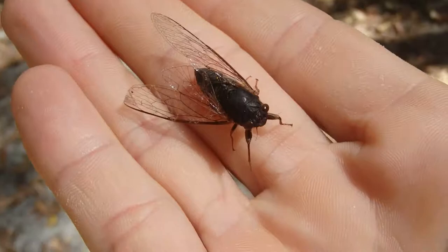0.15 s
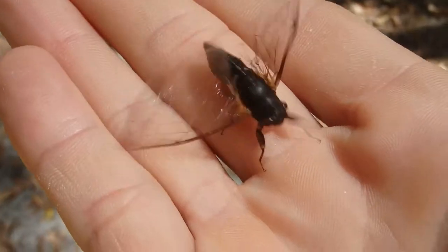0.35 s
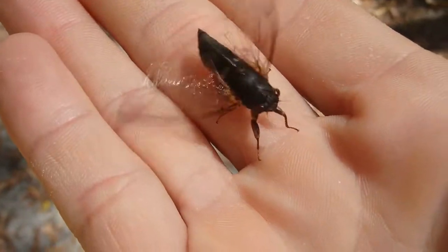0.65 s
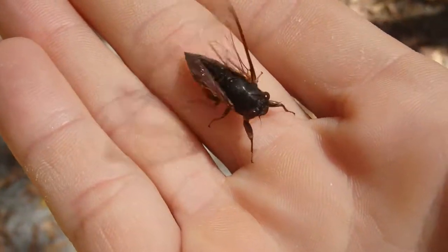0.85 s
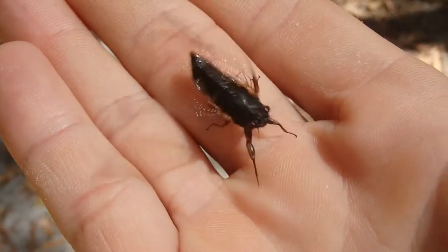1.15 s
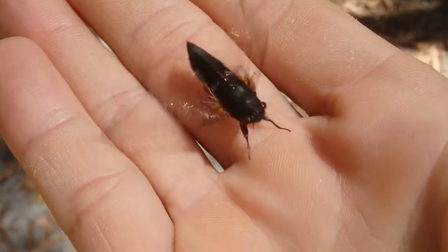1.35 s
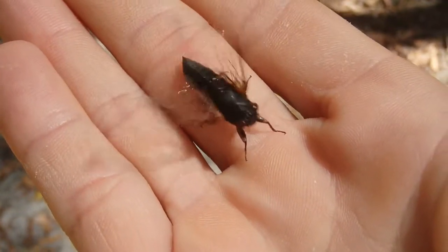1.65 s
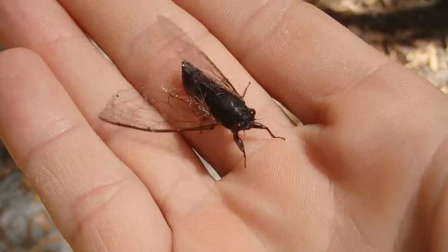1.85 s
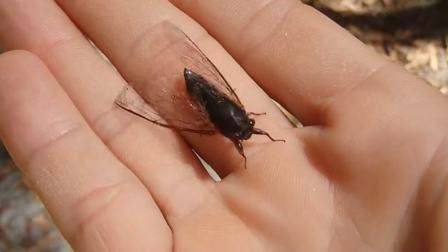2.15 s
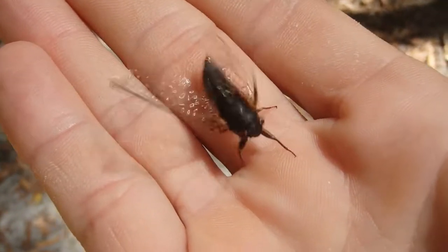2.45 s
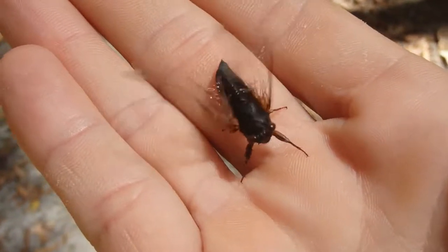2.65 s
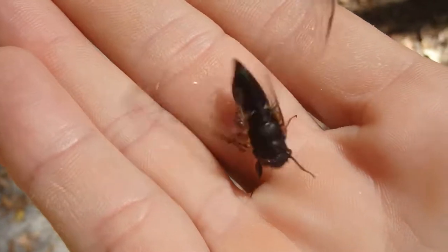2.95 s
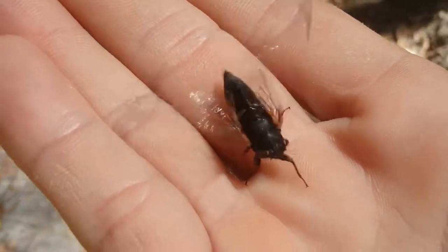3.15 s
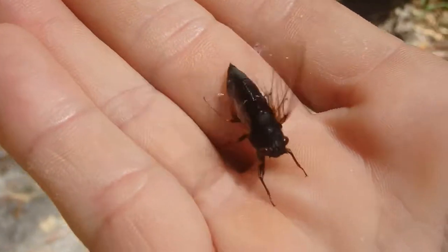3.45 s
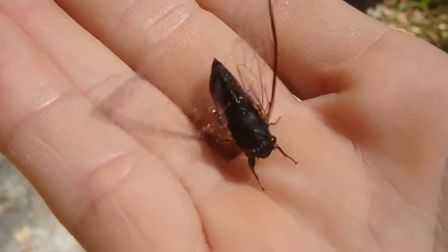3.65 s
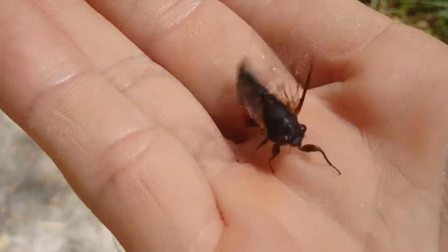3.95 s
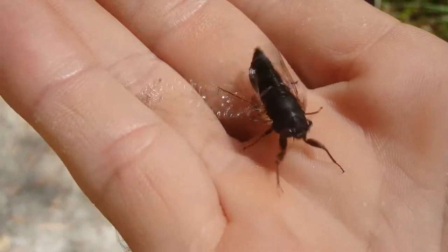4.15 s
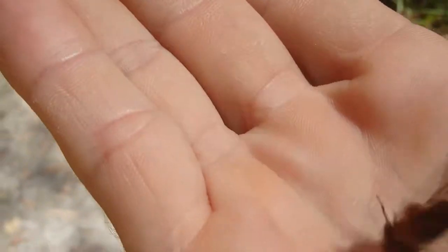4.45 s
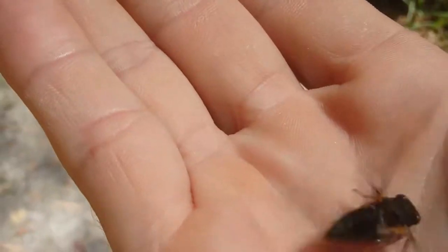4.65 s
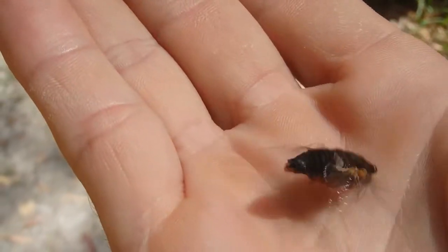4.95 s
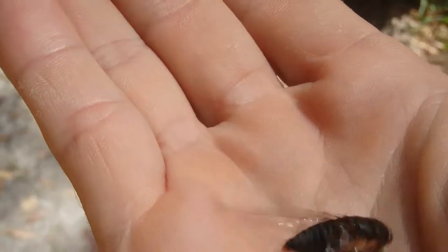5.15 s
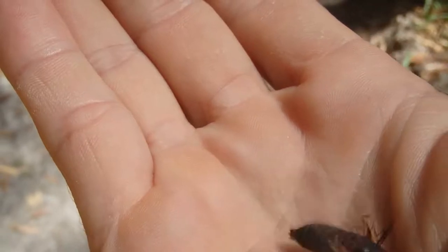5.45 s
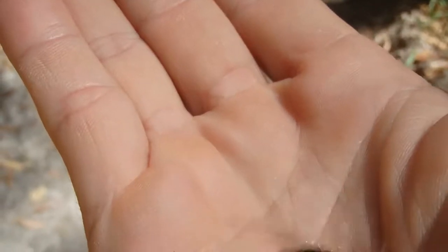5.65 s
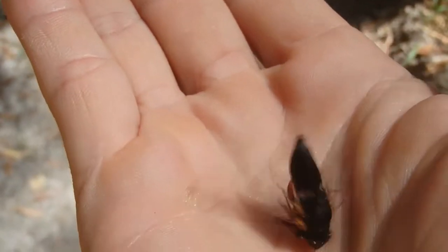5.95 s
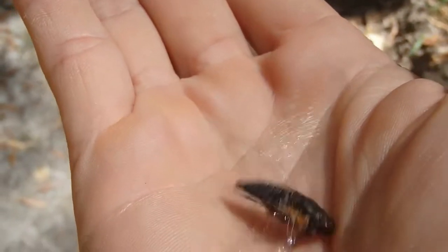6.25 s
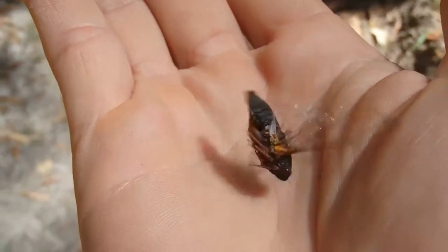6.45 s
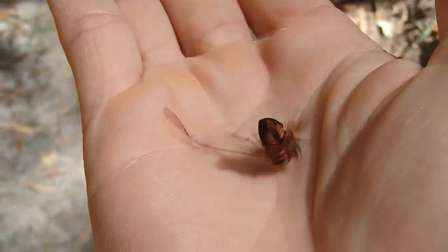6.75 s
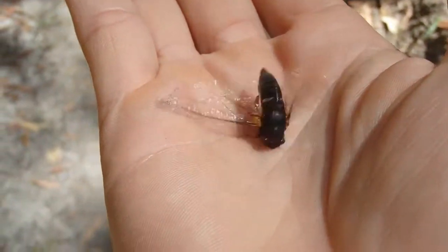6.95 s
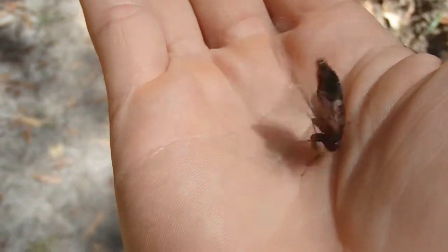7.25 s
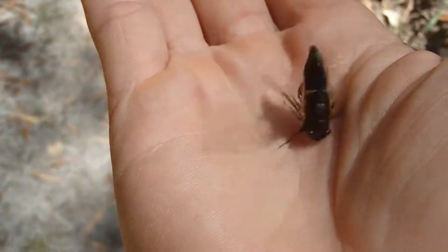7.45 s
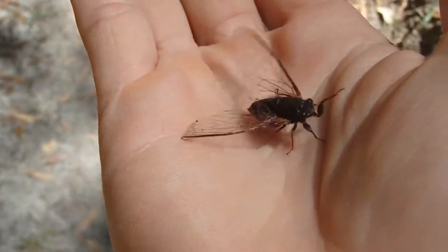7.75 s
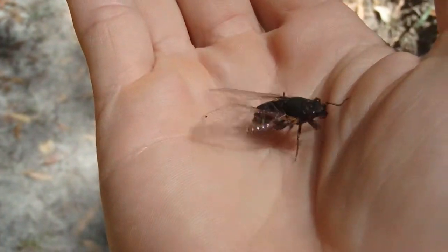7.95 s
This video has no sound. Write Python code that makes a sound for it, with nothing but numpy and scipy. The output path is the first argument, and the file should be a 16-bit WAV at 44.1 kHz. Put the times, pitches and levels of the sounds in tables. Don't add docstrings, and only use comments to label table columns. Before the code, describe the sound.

Outdoors, very close to a small camera microphone, a cicada sits on an open palm. For the first half second there is only soft outdoor hiss, a faint low hum and a few small flicks. From 0.5 to 1.0 s its wings rattle in a loud, dry run of about fifty snaps a second. After a gap with a lone click, more runs follow from 1.35 to 2.0 s and 2.45 to 3.25 s, then short broken bursts until 4.0 s and another run from 4.15 to 4.5 s. Then it tumbles: irregular crackling flutters, hard slaps, tiny claw ticks, papery rustle and low air puffs, with brief gaps as it hops. A dull soft bump falls near 5.8 s. The ragged snapping continues until about 7.9 s, then drops to quiet hiss. The clicks are bright, brittle, ringing and stronger on the left.

```python
import sys
import numpy as np
from scipy import signal
from scipy.fft import irfft
from scipy.io import wavfile
from scipy.ndimage import uniform_filter1d

SR = 44100
rng = np.random.default_rng(int(sys.argv[2]) if len(sys.argv) > 2 else 0)


def persist_wave(psi):
    counts = np.round(np.clip(psi, -1, 1) * 32767).astype(np.int16)
    wavfile.write(sys.argv[1], SR, np.atleast_2d(counts).T)


def makeup_ratio(level_db):
    decades = np.asarray(level_db, float) / 20
    return 10 ** decades


N = 356857

# pitch in Hz, left level in dB, right level in dB, left-right likeness from 0 to 1.
WASH = [(25, -35, -43, .5), (89, -1.5, 0, 0.13), (324, 0.5, 0, 0.73), (1050, 0.5, 1, 0.81),
        (2640, -5, -3.5, 0.33), (3470, -8.5, -9, .05), (4030, -3, -6, .05), (4700, -8, -9.5, .02),
        (8300, -9, -11, .02), (12400, -6.5, -9, .02), (15600, -11, -8.5, .02), (16300, -50, -50, .02)]
WASH_DB = -49
# middle in seconds, half width in seconds, level in dB.
HUM_SWELLS = [
    (.45, 0.97, -59),
    (1.6, 0.26, -59.5),
    (2.75, 0.43, -59.5),
    (3.8, 0.41, -64),
    (4.9, 0.65, -66.5),
    (5.7, 0.13, -59),
    (6.5, 0.32, -60),
    (7.3, 0.62, -64.5),
]
# first in Hz, last in Hz.
HUM_HZ = (101.7, 97.8)
KNOCK_S, KNOCK_DB, KNOCK_HZ = 5.836, -34, 130
# start in seconds, level in dB.
DRAUGHT = [
    (0, -54.5),
    (3.3, -55.5),
    (3.64, -51.5),
    (4.15, -60.5),
    (4.7, -48),
    (5.75, -52),
    (5.95, -62.5),
    (6.36, -51),
    (7.1, -61.5),
    (8.1, -53),
]
# pitch in Hz, left level in dB, right level in dB,
# how far the left leads in radians.
PORTS = [(293, -47.5, -27.5, 2), (1480, -31, -32, -0.13), (3210, -12.5, -10.5, 1.86),
         (3670, -3, -11.5, 2.5), (4090, 0, -11.5, 1.25), (4590, -8, -15, 2), (5350, -18, -62, 8),
         (5790, -6.5, -26.5, -1.5), (7770, -17, -31.5, 2), (8650, -12, -29.5, -1), (11130, -20, -30, 0.5),
         (12060, -36, -32, 0), (14600, -32, -28.5, 1.5), (15500, -43, -61, 22)]
# time in seconds, extra low-mid in dB from the flat of the wing on the skin,
# echo off the palm from 0 to 1, extra treble in dB from the wing edge towards the camera.
POSTURE = [
    (0, -7.5, 0, -5),
    (3.3, 0.5, 0, 2),
    (4.6, 3.5, 1, 3),
    (8.1, 2.5, 1, 3),
]
# first stroke in seconds, last stroke in seconds,
# number of strokes, snap level in dB over one ms, rustle level in dB.
PERCHED_RUNS = [(.5145, 0.7083, 11, -17.5, -31.5), (.7295, .97, 13, -10.5, -39),
                (1.357, 1.422, 4, -12, -40.5), (1.442, 1.5892, 9, -11, -31.5),
                (1.613, 1.8608, 14, -13, -37), (1.878, 2.007, 7, -10, -46), (2.452, 2.824, 20, -13, -34),
                (2.8442, 3.0683, 12, -13.5, -34), (3.0887, 3.236, 8, -11, -37),
                (3.4137, 3.434, 2, -15.5, -39), (3.564, 3.656, 6, -18.5, -34), (3.6767, 3.6999, 2, -6, -41),
                (3.862, 3.9183, 3, -14.5, -47), (4.147, 4.3847, 13, -11, -36),
                (4.4074, 4.47, 4, -11.5, -30)]
# first stroke in seconds, last stroke in seconds,
# number of strokes, snap level in dB over one ms, rustle level in dB.
TUMBLING_RUNS = [(4.5295, 4.548, 2, -7.5, -29.5), (4.581, 4.6222, 3, -19, -41),
                 (4.6963, 4.711, 2, -15, -26.5), (4.877, 5.044, 8, -16, -34.5),
                 (5.1337, 5.196, 3, -13.5, -35), (5.2586, 5.2828, 2, -15, -40),
                 (5.4022, 5.508, 6, -25, -37), (5.533, 5.597, 4, -11.5, -32.5),
                 (5.644, 5.6827, 3, -17, -31.5), (5.713, 5.8019, 5, -12.5, -33),
                 (5.883, 5.907, 2, -19.5, -50), (5.991, 6.0406, 3, -23, -39), (6.088, 6.175, 6, -20, -52),
                 (6.269, 6.3477, 5, -19, -51), (6.383, 6.415, 2, -26.5, -31.5),
                 (6.573, 6.6392, 4, -16, -39), (6.7407, 6.795, 5, -18.5, -40),
                 (6.8553, 6.894, 3, -19.5, -41), (6.9535, 6.98, 2, -18, -46),
                 (7.268, 7.363, 5, -17.5, -47.5), (7.4667, 7.528, 5, -14.5, -58),
                 (7.548, 7.6778, 8, -22, -49), (7.703, 7.791, 5, -16, -34.5), (7.807, 7.903, 6, -17, -37)]
# time in seconds, snap level in dB over one ms, drag in ms.
FLICKS = [(.198, -41, .8), (.4766, -20, .2), (.497, -25, 1.4), (1.0436, -9, 0), (1.2009, -29, .4),
          (1.3185, -29, .3), (2.0688, -6, 0), (2.0973, -19, .5), (2.219, -35, 1.3), (2.3134, -24, .5),
          (2.344, -7, 0), (2.4204, -27, .2), (3.3246, -18, .5), (3.351, -21, .2), (3.4814, -12, .5),
          (3.5398, -14, 0), (3.7386, -11, 0), (3.7665, -25, 1.3), (3.8373, -5, 0), (4.0125, -8, 1),
          (3.8596, -8, 1.3), (4.0707, -27, .7), (4.11, -42, 1.1), (4.504, -13, 1.7), (5.3563, -17, 2.6),
          (7.01, -28, 1), (7.0423, -20, 0), (7.4001, -18, 1.1), (7.985, -44, .4), (8.02, -42, .8)]
# time in seconds, snap level in dB over one ms, drag in ms.
ACCENTS = [(0.65, -9.5, 0), (0.8289, -8.5, 0), (0.8497, -8, 0.33), (.9091, -6, 0.47), (1.354, -23.5, .6),
           (1.3766, -7.5, 0.15), (1.4424, -7, 0.13), (1.5322, -7, .1), (1.612, -21, 0.63),
           (2.5505, -20, 1.4), (2.629, -40, 1), (2.6493, -7, 0.28), (2.8442, -9.5, .2), (2.9466, -25, 1.1),
           (3.0446, -10.5, 0.21), (3.065, -9, 0.48), (3.089, -18, 1.3), (3.2129, -8.5, 0.37),
           (3.56, -27, 1.5), (3.8928, -7.5, 1.56), (4.1654, -10, 2), (4.3874, -10, 0.13),
           (.9305, -10.5, 0.53), (1.8993, -7.5, .5), (1.921, -7.5, 0.18), (2.4519, -11, .9),
           (2.6085, -13.5, .2), (4.5515, -8.5, 1.05), (4.973, -9.5, 1.3), (6.799, -12.5, 1)]
# time in seconds, snap level in dB over one ms, drag in ms.
SLAPS = [(4.652, -14, .6), (4.6854, -6, 0), (4.7665, -16, .8), (4.822, -15, .9), (4.9289, -8, .5),
         (5.0858, -17, 2), (5.2028, -7, .1), (5.3312, -6, 2.6), (5.4431, -10, 1.2), (5.4838, -9, 1.8),
         (5.5487, -4, 0), (5.6892, -12, 1.7), (5.8019, -6, 1.8), (5.8375, -4, 0), (5.9541, -22, .4),
         (6.1966, -10, 2.5), (6.2226, -14, 1.6), (6.3291, -14, 2.6), (6.4314, -7, 1), (6.4671, -12, 2.6),
         (6.5207, -13, 0), (6.704, -12, 2.6), (6.9177, -7, 0), (7.0637, -11, 1.2), (7.1265, -7, .6),
         (7.1716, -15, 2.6), (7.2075, -13, 1.6), (7.439, -19, .7), (7.499, -9, 0), (7.5232, -9, 0)]
# time in seconds, drag in ms.
DRAG = [
    (0, .5),
    (3.7, .4),
    (4.1, 1.6),
    (4.5, 1.7),
    (4.9, .9),
    (8.1, 1.1),
]
AIRBORNE = [4.745, 5.115, 5.385, 5.625, 5.93, 6.065, 6.255, 7.42]
HOP_S = .018
JITTER_MS, SCATTER_DB = .5, 1.4
LIMP_MS, LIMP_DB = .5, .8
DRAG_SCATTER_MS = .4
LEAD_S, TRAIL_S, STILL_DB = 0.015, 0.022, -58
SCRABBLE_FROM_S, SCRABBLE_TO_S, SCRABBLE_DB = 4.5, 7.93, -45
SKID_S, SKID_DB = 0.048, -45.5
TICKS_COUNT, TICK_DB = 110, -24
LULL = .45


def evened(x):
    return x / np.sqrt(np.mean(x ** 2) + 1e-20)


def on_log_hz(table, hz):
    f, *columns = np.transpose(table)
    return [np.interp(np.log(hz + 1), np.log(f), c) for c in columns]


def on_time(table):
    s, *columns = np.transpose(table)
    return [np.interp(np.arange(N) / SR, s, c) for c in columns]


def wash(patchy_db=.4):
    frames = N // 256 + 5
    left_db, right_db, same = (c[:, None] for c in on_log_hz(WASH, np.fft.rfftfreq(1024, 1 / SR)))
    a, b, c, d, patches = rng.standard_normal((frames, 513, 5)).T
    patches = evened(uniform_filter1d(uniform_filter1d(patches, 12, 0), 20, 1))
    same = np.clip(same, 0, 1)
    left = a + 1j * b
    right = same * left + np.sqrt(1 - same ** 2) * (c + 1j * d)
    z = np.array([left, right]) * makeup_ratio(np.array([left_db, right_db]) + patchy_db * patches)
    noise = signal.istft(z, nperseg=1024, noverlap=768)[1][:, :N]
    return makeup_ratio(WASH_DB + 1.5) * evened(noise)


def hum():
    t = np.arange(N) / SR
    turns = np.cumsum(np.linspace(*HUM_HZ, N)) / SR
    level = sum(makeup_ratio(db) * np.exp(-((t - s) / width) ** 2) for s, width, db in HUM_SWELLS)
    sides = makeup_ratio(np.array([[-1.5], [1.5]]))
    return np.sqrt(2) * level * sides * np.sin(2 * np.pi * turns)


def knock():
    u = np.maximum(np.arange(N) / SR - KNOCK_S, 0) * 2 * np.pi * KNOCK_HZ
    return makeup_ratio(KNOCK_DB) * u * (2 - u) * np.exp(-u)


def draught(strokes, hz=215, ring_ms=1.57, swish_db=3.5, swish_hz=1100):
    t = np.arange(1024) / SR
    pushes = makeup_ratio(1.3 * rng.standard_normal(N)) * (strokes > 0)
    puff = np.sin(2 * np.pi * hz * t) * t * np.exp(-t * 1000 / ring_ms)
    puffs = evened(signal.oaconvolve(pushes, puff)[:N])
    gusts = signal.oaconvolve(pushes, t * np.exp(-t * 130))[:N]
    band = signal.butter(1, [150, swish_hz], "bandpass", fs=SR)
    air = signal.lfilter(*band, rng.standard_normal((2, N)))
    swish = evened(gusts * np.array([air[0], air[0] + 0.19 * air[1]]))
    puffs = signal.lfilter(*signal.butter(2, hz / 2, "high", fs=SR), puffs)
    return makeup_ratio(on_time(DRAUGHT)[0] - 2.5) * (puffs + makeup_ratio(swish_db) * swish)


def ports(size=1024, order=32):
    left_db, right_db, lead = on_log_hz(PORTS, np.fft.rfftfreq(size, 1 / SR))
    log_gain = np.log(makeup_ratio(left_db))
    phase = -signal.hilbert(np.r_[log_gain, log_gain[-2:0:-1]]).imag[:len(lead)]
    ring = irfft(makeup_ratio([left_db, right_db]) * np.exp(1j * np.array([phase, phase - lead])), size)
    ring = ring / np.linalg.norm(ring[0])
    return np.roll(ring, order, 1)[:, :size // 2], order


def run_strokes():
    runs = PERCHED_RUNS + TUMBLING_RUNS
    chance, even, rows = rng.standard_normal((len(runs), 20, 3)), [], []
    for (first, last, count, db, _), draw in zip(runs, chance):
        k = np.arange(round(count))
        s = np.linspace(first, last, len(k))
        limp = (-1.) ** k
        late, hard, long = draw[k].T
        drag_ms = np.interp(s, *np.transpose(DRAG)) + DRAG_SCATTER_MS * (long - hard) / np.sqrt(2)
        when = s + (JITTER_MS * late + LIMP_MS * limp) / 1000
        even += list(s)
        rows += zip(when, db + SCATTER_DB * hard - LIMP_DB * limp, drag_ms)
    return np.array(rows), np.array(even)


def stray_ticks():
    when, size, drag_ms = rng.random((TICKS_COUNT, 3)).T
    s = SCRABBLE_FROM_S + (SCRABBLE_TO_S - SCRABBLE_FROM_S) * when
    ticks = np.c_[s, TICK_DB + 10 * (size - .5), drag_ms / 2]
    ticks[abs(ticks[:, :1] - AIRBORNE).min(1) < HOP_S, 1] = -99
    return ticks


def beats():
    blows = np.array(FLICKS + ACCENTS + SLAPS)
    rows, even = run_strokes()
    taken = abs(rows[:, :1] - blows[:, 0]).min(1) < .007
    rows[taken, 1] = -99
    return np.r_[rows, blows, stray_ticks()], even


def snap(ring, db, spread_ms, echo, draw, uneven_db=7.0, wobble_db=1.0, size=800):
    count = int(np.clip(1.8 + 9 * spread_ms, 1, len(draw)))
    delay = draw[:count, 0] + draw[:count, 0] ** 2 / 7
    at = size // 2 + delay * (.05 + 1.1 * spread_ms) * SR / 1000
    at = np.clip(at, 0, size - 20).astype(int)
    burst = np.zeros(size)
    np.add.at(burst, at, np.sign(draw[:count, 1]) * makeup_ratio(uneven_db * abs(draw[:count, 1])))
    blunt = np.clip(.6 - .35 * spread_ms + .18 * draw[0, 2], .05, .6)
    burst = np.convolve(burst, [blunt, 1, blunt], "same")
    burst = burst + echo * np.tanh(2 * draw[3, 2]) * np.roll(burst, 3 + int(7.0 * abs(draw[4, 2])))
    other = np.roll(burst, int(round(0.33 * draw[1, 2]))) * makeup_ratio(wobble_db * draw[2, 2])
    energy = np.sum(signal.oaconvolve(burst, ring) ** 2) * 1000 / SR
    return np.array([burst, other]) * makeup_ratio(db) / np.sqrt(energy)


def busy(size=32):
    t = np.arange(0, N, size) / SR
    on_skin = np.prod([abs(t - s) > HOP_S for s in AIRBORNE], axis=0)
    level = makeup_ratio(STILL_DB) + makeup_ratio(SCRABBLE_DB) * (t > SCRABBLE_FROM_S) * (t < SCRABBLE_TO_S) * on_skin
    for first, last, count, _, db in PERCHED_RUNS + TUMBLING_RUNS:
        ramp = np.clip(np.minimum((t - first) / LEAD_S, (last - t) / TRAIL_S) + 1.5, 0, 1)
        cycle = (t - first) * (count - 1) / (last - first) % 1
        level = np.maximum(level, makeup_ratio(db) * ramp ** 2 * (1 - LULL * np.sin(np.pi * cycle ** 1.3)))
    for s, _, drag_ms in SLAPS:
        skid = (t > s) * np.clip(2 - 2 * (t - s) / SKID_S, 0, 1)
        level = np.maximum(level, makeup_ratio(SKID_DB) * drag_ms * skid)
    return np.interp(np.arange(N) / SR, t, level)


def rustle(strokes, halo_db=-19, after_ms=5.1):
    t = np.arange(-2048, 2049) / SR * 1000
    halo = signal.oaconvolve(strokes, np.exp(np.minimum(t / 2.6, -t / after_ms)), "same")
    level = makeup_ratio(3.5) * busy() + makeup_ratio(halo_db) * halo
    grain = rng.standard_normal((2, N)) * makeup_ratio(2.8 * np.minimum(rng.exponential(1, N), 4))
    grain = grain * (rng.random(N) < 6000 / SR)
    z = signal.stft(grain, nperseg=128)[2]
    patches = rng.standard_normal(z.shape[:0:-1])
    patches = evened(uniform_filter1d(uniform_filter1d(patches, 4, 0), 8, 1)).T
    grain = evened(signal.istft(z * makeup_ratio(4 * patches), nperseg=128)[1][:, :N])
    return level * np.array([grain[0], grain[0] + .5 * grain[1]])


def cicada():
    ring, early = ports()
    rows, even = beats()
    draws = rng.standard_normal((len(rows), 26, 3))
    flat_db, echo, edge_db = on_time(POSTURE)
    clicks, strokes = np.zeros((2, N + 800)), np.zeros(N)
    for (s, db, spread_ms), draw in zip(rows, draws):
        at = round(s * SR)
        clicks[:, at - 400:at + 400] += snap(ring[0], db, max(spread_ms, 0), np.clip(echo[at], 0, 1), draw)
        strokes[at] = makeup_ratio(db)
    clicks = clicks[:, :N] + rustle(strokes)
    low = signal.lfilter(*signal.butter(1, [1900, 3300], "bandpass", fs=SR), clicks)
    high = signal.lfilter(*signal.butter(2, 7000, "high", fs=SR), clicks)
    clicks = clicks + (makeup_ratio(flat_db) - 1) * low + (makeup_ratio(edge_db) - 1) * high
    ringing = signal.oaconvolve(clicks, ring, axes=1)[:, early:early + N]
    push_s = np.r_[even, np.transpose(SLAPS)[0]]
    pushes = np.bincount((push_s * SR).astype(int), minlength=N)
    return ringing + draught(pushes)


def scene():
    return cicada() + knock() + wash() + hum()


def top_cut(x):
    return signal.sosfilt(signal.butter(12, 16510, fs=SR, output="sos"), x)


def record(dry):
    power_db = 10 * np.log10(abs(uniform_filter1d((dry ** 2).max(0), 100)) + 1e-12)
    fall = np.arange(N) * 60. / SR
    over_db = np.maximum(np.maximum.accumulate(power_db + fall) - fall + 13, 0)
    late_db = uniform_filter1d(over_db, 200, origin=99)
    x = signal.lfilter(*signal.butter(2, 50, "high", fs=SR), dry / makeup_ratio(.5 * late_db))
    x = np.clip(x, -.97, .97)
    treble_limit = signal.firwin(201, 16300, window=("kaiser", 8), fs=SR)
    x = signal.oaconvolve(x, treble_limit[None], "same")
    return top_cut(x)


dry = scene()
out = record(dry)
persist_wave(out)
```